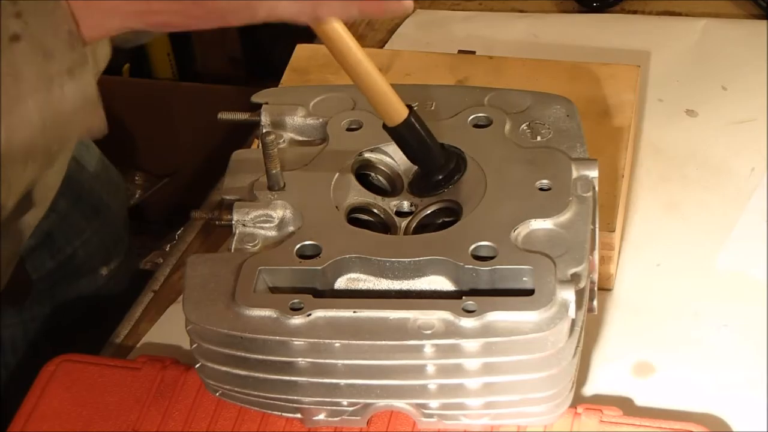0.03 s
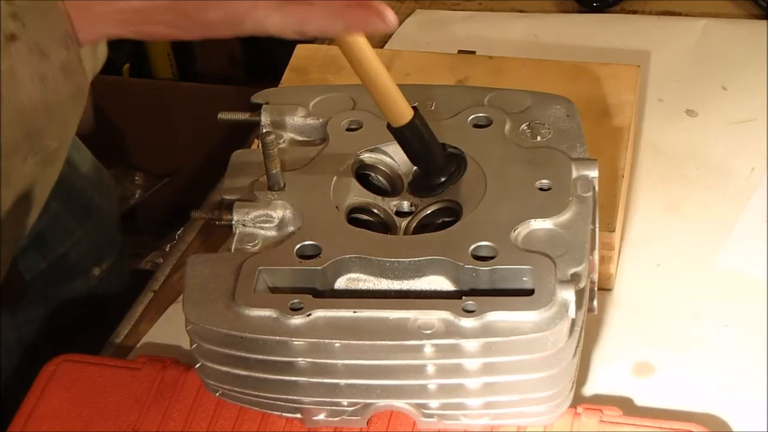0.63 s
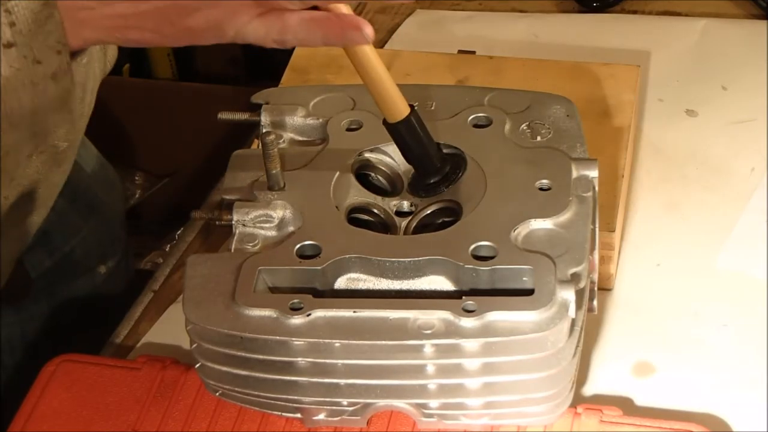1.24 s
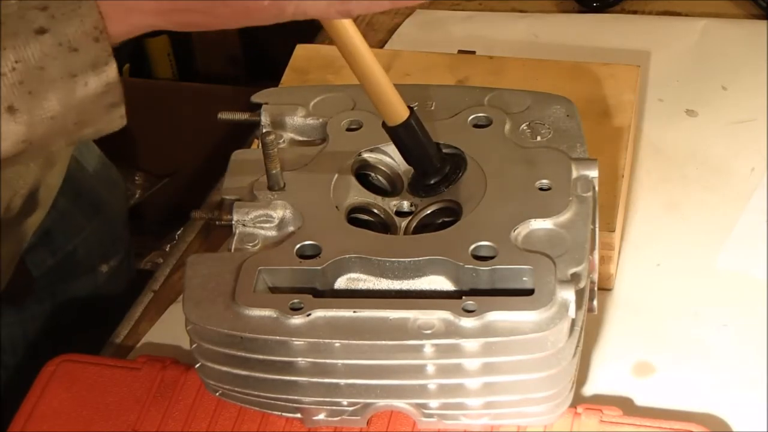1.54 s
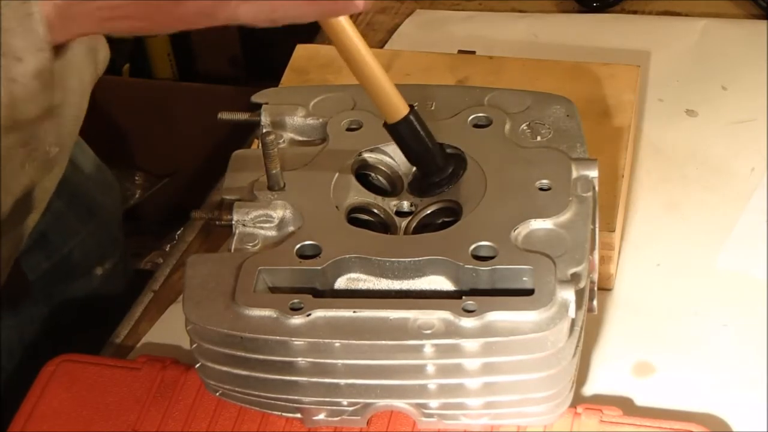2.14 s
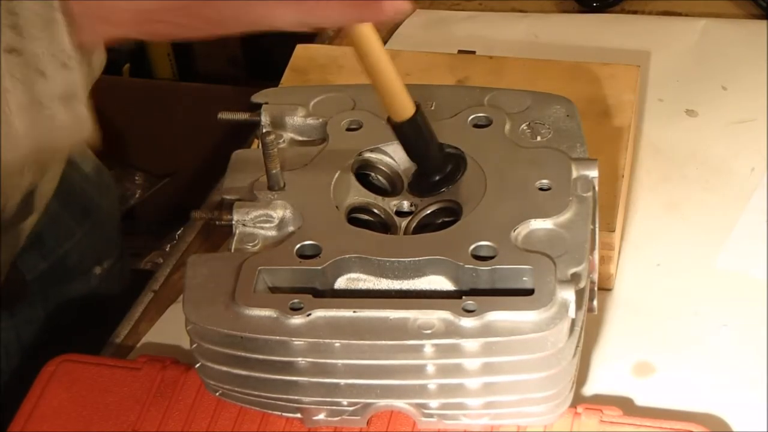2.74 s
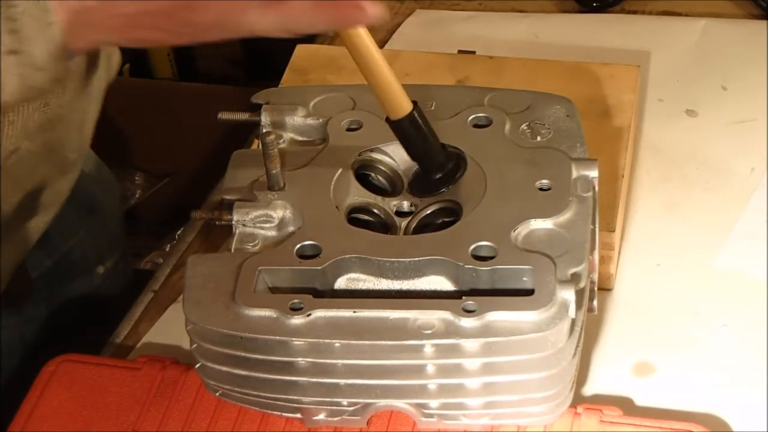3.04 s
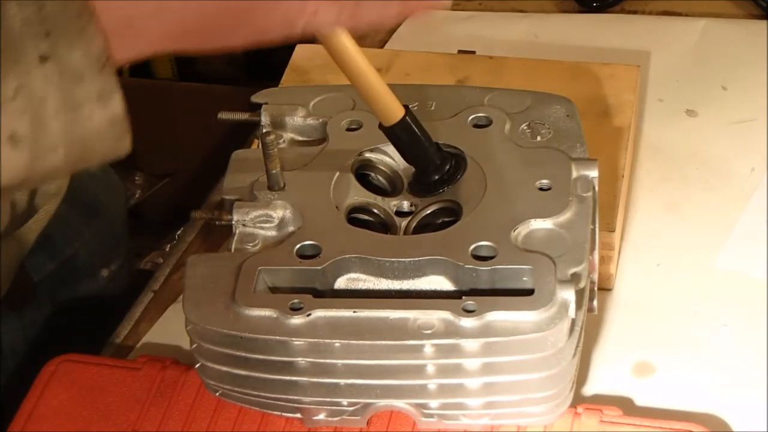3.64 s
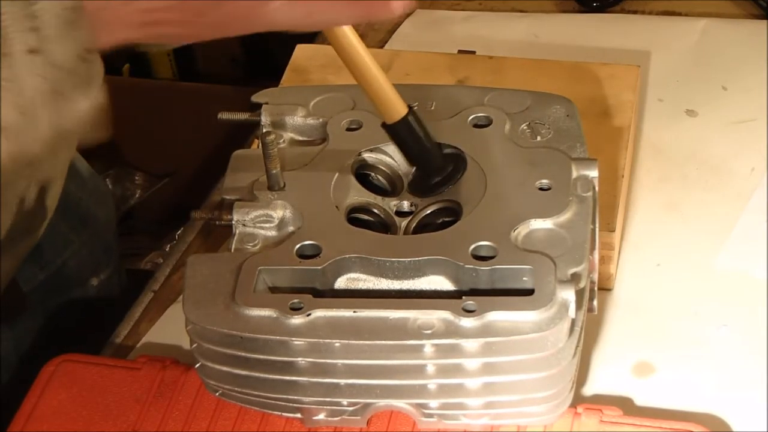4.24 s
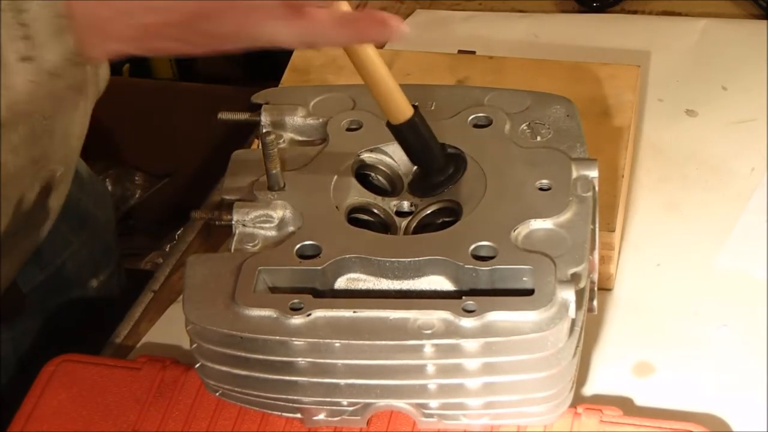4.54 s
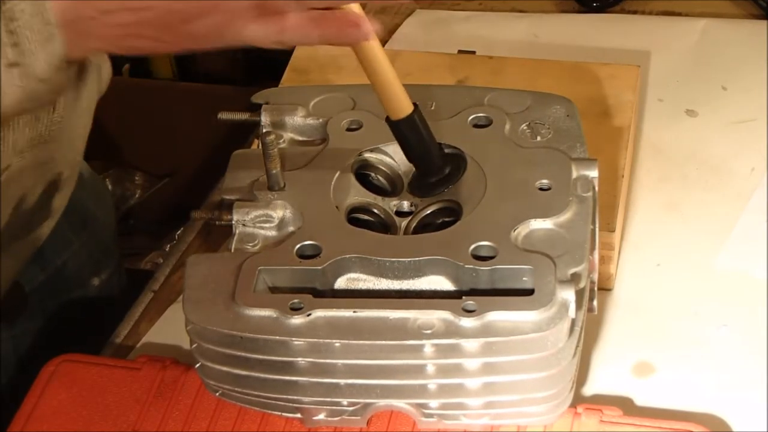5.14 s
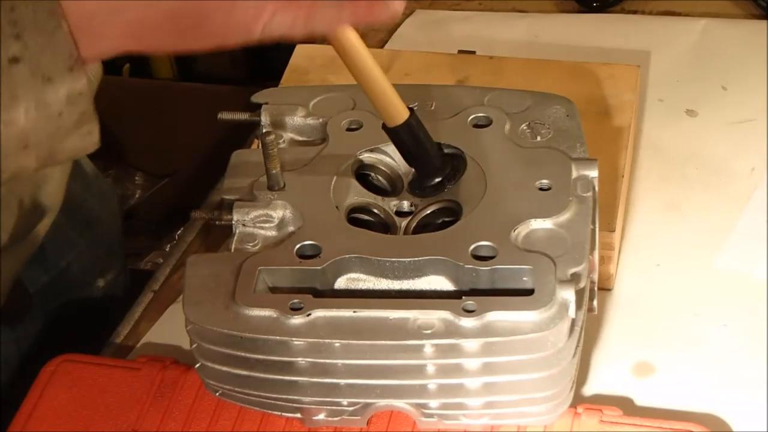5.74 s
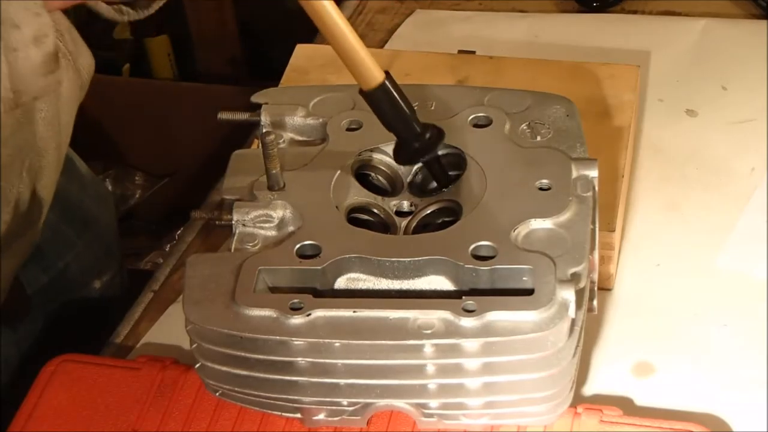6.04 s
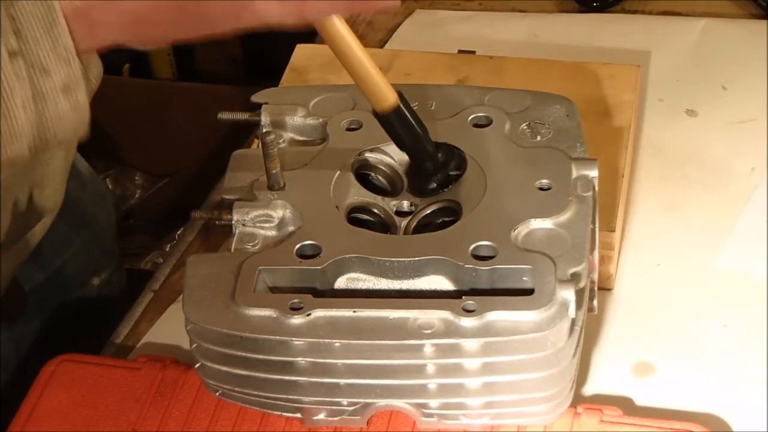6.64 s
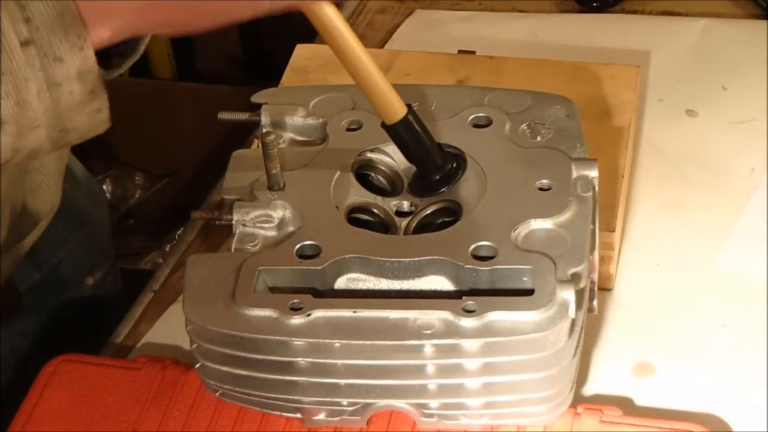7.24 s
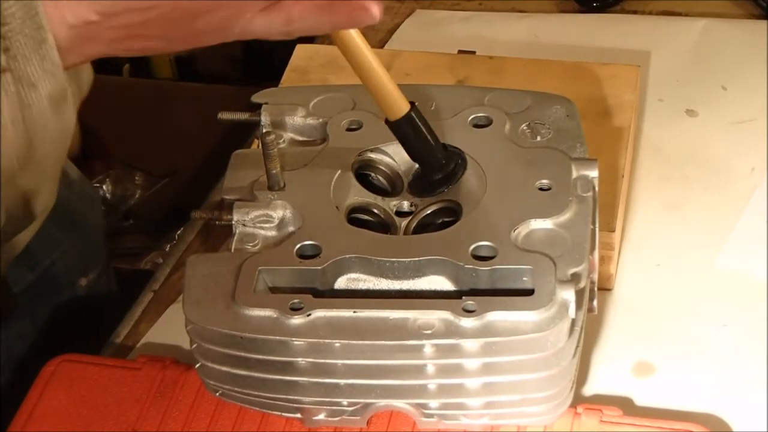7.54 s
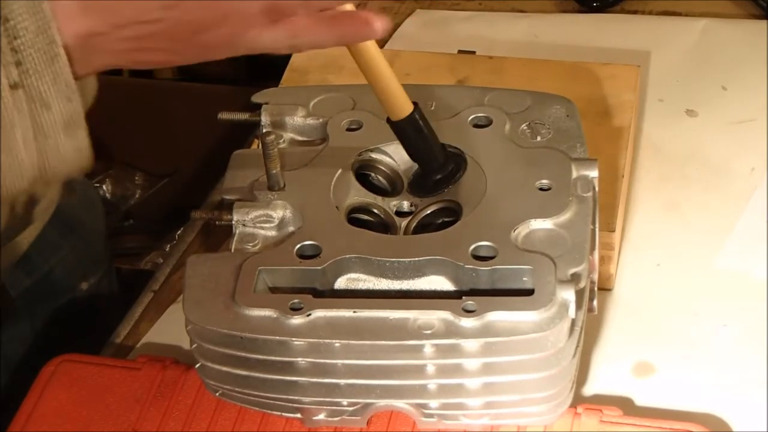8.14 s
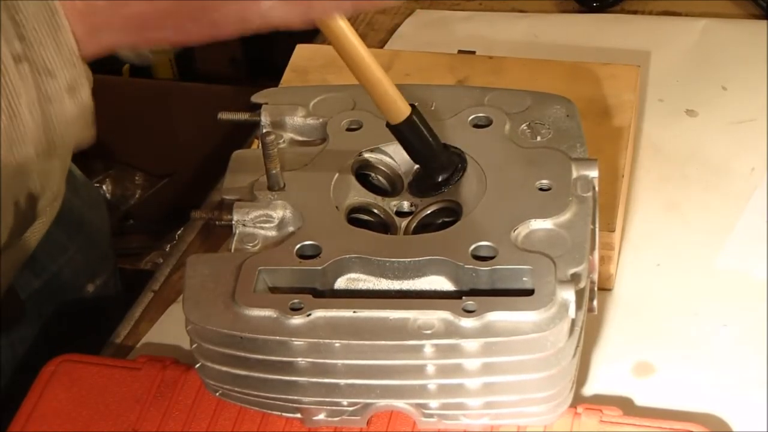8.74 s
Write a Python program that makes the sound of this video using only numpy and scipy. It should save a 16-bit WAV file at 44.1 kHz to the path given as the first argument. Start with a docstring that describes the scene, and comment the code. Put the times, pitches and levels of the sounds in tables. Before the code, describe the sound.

A valve is ground against its seat in an aluminium cylinder head, heard close up in a small workshop. The gritty rasping pulses at about ten strokes a second, each spell starting crunchy and wearing to a finer hiss that rings the metal. The first spell runs until 1.1 seconds. A light clink at 2 seconds starts the second, lasting to 3.4. After faint ticks, a ringing knock at 4.1 opens the third, which ends at 5.5. The stick's rubber suction cup snaps softly at 5.8. From 6.2 to 6.9 the valve is tapped on its seat about six times with sharp metallic clacks. Another knock at 7.2 leads into a last coarse spell, until 8.1. Two bright, ringing taps follow at 8.7 and 8.9. Soft bench thuds accompany the work, over a faint steady electrical hum.

```python
"""A small workshop, one microphone close to the bench, where a valve is lapped in an aluminium cylinder head.
A suction stick is rolled between the palms, and each half turn drags abrasive paste over the seat:
fresh grit crunches, then wears to a fine hiss that rings the casting. Between passes the valve is
lifted and tapped back on its seat. The rubber cup ticks, the bench thuds, and the room hums behind."""
import sys
import numpy as np
from scipy import signal
from scipy.fft import rfft, irfft
from scipy.io import wavfile
from scipy.ndimage import uniform_filter1d

SR = 44100
rng = np.random.default_rng(int(sys.argv[2]) if len(sys.argv) > 2 else 0)


def waveform_to_disk(signal):
    """Save audio, clipped to [-1, 1], as 16-bit WAV at the path in sys.argv[1]."""
    frames = np.transpose(np.atleast_2d(signal))
    scaled = np.clip(frames, -1, 1) * 32767
    samples = np.round(scaled).astype(np.int16)
    wavfile.write(sys.argv[1], SR, samples)


N = 391608
TIME = np.arange(N) / SR
RING_TIME = TIME[:SR // 2]
HALF_TURN_S = 0.104


def lapping(registers, lead_s=0.0097, grip=3.3, turn_db=-16, port_db=-13, port_share=0.62):
    """Close up, the valve speeds up and stops once a stroke; the grit it crushes excites the head."""
    start, length, accent = strokes().T
    start = start - lead_s
    stroke = np.maximum(np.searchsorted(start, TIME, side="right") - 1, 0)
    phase = np.clip((TIME - start[stroke]) / length[stroke], 0, 1)
    # the palms push early in some strokes and late in others
    skew = np.exp(0.27 * rng.standard_normal(len(start)))
    speed = np.sin(np.pi * phase ** skew[stroke]) ** 2
    friction = (np.tanh(grip * speed) + undb(turn_db)) * (phase < 1)
    # uneven paste makes the valve catch and slip
    catch = friction * undb(0.39 * wander(70))
    # coarse grains bite as soon as the valve turns and thin out along the stroke
    bite = np.tanh(7 * speed) * undb(-5 * phase)
    coarse = grit(per_second=800, spread_db=3.0) * bite * undb(2.0 * wander(150))
    fine = grit(per_second=4000, spread_db=3.0) * catch
    pressure_db, fresh_db = paste()
    stroke_db = accent + 0.5 * rng.standard_normal(len(start))
    force = undb(pressure_db + stroke_db[stroke])
    crunch = coarse * undb(-47 + fresh_db)
    # only big, fresh grains jolt the valve enough to sound the port
    hollow = crunch * undb(port_db + port_share * fresh_db)
    rasp = fine * undb(-38 + 0.31 * fresh_db)
    hiss = fine * undb(-41.5 + 0.32 * fresh_db)
    drives = hollow, crunch, rasp, hiss
    return sum(convolve(force * drive, register) for drive, register in zip(drives, registers))


def grit(per_second, spread_db):
    """Grains crack at random moments, a few much larger than the rest."""
    cracks = rng.random(N) < per_second / SR
    size = undb(spread_db * np.minimum(rng.exponential(size=N), 4))
    return unit(cracks * size * rng.choice([-1, 1], N))


# spells of rolling the stick; a very short one just turns the valve to a new place:
# start t/s, end t/s, mid-spell lag/s, hand pressure/dB, easing off/(dB/s), fresh grit/dB, crush time/s
SPELLS = [(-0.075, 1.135, 0.0033, 0.74, 2.5, 17, 0.61), (1.531, 1.628, 0, -23.5, 6, 10, 0.24),
          (2.007, 3.393, 0.018, 1.24, 5, 4.5, 0.2), (3.648, 3.76, 0, -20.5, 4, 12.5, 0.3),
          (4.142, 5.516, 0.004, -3.5, 1.4, 18, 0.11), (7.209, 8.141, 0.015, 0.23, 5.5, 17, 0.41)]

def strokes(push_db=0.45):
    """Half turns, slow then quicker, the push stronger than the return: start t/s, length/s, accent/dB."""
    rows = []
    for start, end, lag, *_ in SPELLS:
        count = max(round((end - start) / HALF_TURN_S), 1)
        progress = np.arange(count + 1) / count
        turns = start + (end - start) * progress + lag * np.sin(np.pi * progress)
        rows += zip(turns[:-1], np.diff(turns), push_db * (-1) ** np.arange(count))
    return np.array(rows)


def paste():
    """Hand pressure and the extra level of uncrushed grit, in dB: each spell starts fresh and wears down."""
    start, _, _, pressure, easing, fresh, crush_s = np.transpose(SPELLS)
    spell = np.maximum(np.searchsorted(start - HALF_TURN_S, TIME) - 1, 0)
    age = TIME - start[spell]
    uncrushed = np.exp(-(age / crush_s[spell]) ** 2)
    return pressure[spell] - easing[spell] * age, fresh[spell] * uncrushed


# modes of the air in the port and chamber: f/Hz, width/Hz before width_scale, relative level/dB
PORT_MODES = [(1008, 38, -13.5), (1049, 33, -12), (1069, 25, -2), (1099, 32, -10), (1194, 128, -17),
              (1301, 30, -16), (1648, 58, -20), (1810, 72, -14), (1972, 41, -7), (2051, 39, -12),
              (2314, 117, -16), (2520, 151, -14), (2925, 80, -13)]
# modes of the valve and casting, same columns
METAL_MODES = [(3612.0, 37.0, -16.8), (4196.0, 19.0, -7.1), (4769.0, 24.0, -11.3), (4859.0, 22.0, -11.4),
               (5349.0, 34.0, -8.9), (5549.0, 17.0, -6.2), (5780.0, 24.0, 2.0), (6215.0, 20.0, -5.8),
               (6451.0, 35.0, -8.2), (7199.0, 30.0, -19.9), (7465.0, 29.0, -13.5), (7611.0, 17.0, -11.9),
               (7905.0, 17.0, -8.4), (8024.0, 20.0, -16.1), (8197.0, 22.0, -13.5), (8662.0, 34.0, -10.5),
               (8822.0, 32.0, -11.4), (8937.0, 24.0, -14.7), (9257.0, 19.0, -13.5), (9410.0, 22.0, -5.0),
               (9634.0, 22.0, -13.3), (9713.0, 18.0, -9.3), (9955.0, 31.0, -9.1), (10269.0, 21.0, -14.7),
               (10349.0, 23.0, -9.5), (10585.0, 27.0, -14.4), (10861.0, 29.0, -9.8), (11141.0, 20.0, -13.8),
               (13928.0, 22.0, -18.8), (14870.0, 23.0, -16.7), (15563.0, 22.0, -18.5)]
# dense weak modes of the cooling fins: f/Hz, relative level/dB
FIN_SPECTRUM = [(500, -25), (780, -37), (1150, -9), (1500, -37), (1800, -20.5), (2500, -25.5), (3200, -26),
                (3900, -23), (4600, -25.5), (5700, -19.5), (6400, -31), (7200, -36), (10000, -16.5),
                (11800, -31), (13000, -25.5), (15300, -24.5)]
# borders of the port note, clack, ring and ping registers: f/Hz
REGISTER_EDGES = [660, 1500, 3300, 7000, 18000]

def cylinder_head(drive_spectrum=((1000, 0),), fins_db=0, width_scale=0.68):
    """The head's response at the seat, split into four registers of unit energy each."""
    drive_hz, drive_db = np.transpose(drive_spectrum)
    modes = list(PORT_MODES) + list(METAL_MODES)
    # neighbouring modes swing in opposite directions, except the close trio of the port note
    signs = -(-1) ** np.arange(len(modes))
    signs[1:4] = 1
    fins = [(hz, db + np.interp(hz, drive_hz, drive_db)) for hz, db in FIN_SPECTRUM]
    response = undb(fins_db) * tail(fins, t60=0.051)
    for sign, (hz, width, db) in zip(signs, modes):
        response += sign * ring([(hz, width_scale * width, db + np.interp(hz, drive_hz, drive_db))])
    parts = [band(response, lo, hi) for lo, hi in zip(REGISTER_EDGES, REGISTER_EDGES[1:])]
    return [part / np.sqrt(np.sum(part ** 2)) for part in parts]


# how the whole valve face drives the modes, against a single grain: f/Hz, level/dB
FACE_SPECTRUM = [(1000, 0.5), (2400, -4), (3000, -7), (3600, 6.5), (4200, 3.5), (5800, 2.5), (6300, -3),
                 (7500, -10), (10500, 4.5), (15000, -3.5)]
# the valve lands on its seat: t/s, level/dB, hardness/dB, extra metal ring/dB
LANDINGS = [(1.613, -41, -9, -2), (1.96, -28, 6, 6), (2.015, -19.5, 2, -4), (3.714, -34.5, 1, -2),
            (4.097, -19.5, 4, -4), (4.151, -10.5, -4.5, 10), (6.178, -8, -4.5, 2.5), (6.366, -8, 0.5, 0.5),
            (6.506, -8.5, 0, -7.5), (6.677, -8, -2.5, -2.5), (6.808, -8.5, 3, 1), (6.915, -16.5, -2.5, -1),
            (7.182, -20.5, 5, -17), (7.208, -11.5, -15, 7), (8.692, -7, 2, 12.5), (8.871, -6.5, 1, 7)]

def valve_knocks(registers, port_db=-10, clack_db=-20, ring_db=-28, ping_db=-30, ping_growth=1.6):
    """Each landing strikes the head; a harder one is brighter, and some leave the metal freer to ring."""
    out = np.zeros(N)
    attack = SR // 50
    voices = [register / np.sqrt(np.mean(register[:attack] ** 2)) for register in registers]
    for s, db, hard, free in LANDINGS:
        levels = [port_db, clack_db + hard, ring_db + hard + free, ping_db + ping_growth * hard]
        add(out, s, undb(db) * undb(levels) @ voices)
    return out


# the valve skips round its seat before it settles: t/s, length/s, level/dB
SKIPS = [(0.023, 0.08, -35), (2.017, 0.11, -36), (4.136, 0.05, -27.5), (7.215, 0.059, -21),
         (7.321, 0.028, -22.5)]

def valve_chatter(registers, per_second=170, clack_db=-13):
    """Quick, uneven little bounces keep the port note ringing."""
    port, clack = registers[:2]
    bounces = np.zeros(N)
    for s, length, db in SKIPS:
        count = int(length * per_second) + 1
        late, weak = rng.random((count, 2)).T
        times = s + (np.arange(count) + 0.696 * late) / per_second
        bounces[(times * SR).astype(int)] = undb(db - 6.2 * weak) * np.sqrt(SR / per_second)
    return convolve(bounces, port + undb(clack_db) * clack)


# the cup slips on the valve face: t/s, level/dB
CUP_SLIPS = [(3.551, -30), (3.8921, -34.5), (3.946, -28.5), (4.0662, -24.5), (5.807, -26), (5.816, -16.5),
             (5.8377, -13.5), (6.567, -29.5), (6.7147, -29), (7.7374, -26), (8.145, -28), (8.426, -37),
             (8.5085, -26.5)]
# short resonances of the cup: f/Hz, width/Hz, relative level/dB
CUP_MODES = [(2520, 480, 5.5), (5650, 700, -1), (7100, 1000, -5), (14500, 2500, -15)]

def rubber_cup(gain_db=-0.5, peel_db=-23, peel_s=0.012, click_db=-21, creak_delay_s=0.022):
    """Rubber lets go of oily steel: a snap and a brief peeling crackle ring the cup."""
    out = np.zeros(N)
    t = RING_TIME[:SR // 10]
    body = band(ring(CUP_MODES)[:len(t)], 1800, 17000, order=3)
    # the cup also creaks each time the twist reverses, louder under more pressure
    reversals = strokes()[:, 0]
    pressure_db = np.interp(reversals, TIME, paste()[0])
    creak_db = -33.5 + pressure_db + 2.5 * rng.standard_normal(len(reversals))
    ticks = list(CUP_SLIPS) + list(zip(reversals + creak_delay_s, creak_db))
    releases = undb(peel_db) * rng.standard_normal((len(ticks), len(t))) * np.exp(-t / peel_s)
    releases[:, 0] = 1  # the snap ahead of the crackle
    clicks = undb(click_db) * band(releases, 800, 14000, order=2)
    for (s, db), release, click in zip(ticks, releases, clicks):
        snap = convolve(release, body) + click
        add(out, s, undb(db + gain_db) * snap / np.abs(snap).max())
    return out


# modes of the bench top: f/Hz, width/Hz, relative level/dB
BENCH_MODES = [(58, 7.9, 8.5), (67.2, 5.6, -1)]
# the hands lean on the bench: t/s, peak level/dB
HAND_BUMPS = [(1.609, -44), (1.971, -32.5), (2.73, -37.5), (3.73, -40), (4.631, -33), (5.742, -39),
              (5.852, -36), (8.43, -39), (8.531, -35.5)]

def bench(stroke_db=-43, scatter_db=3, knock_db=-20, rumble_db=-59):
    """Under the head, the bench thuds at every stroke, landing and shift of the hands, over a low rumble."""
    boards = tail([(90, -56), (150, -26.5), (300, -21.0), (500, -26), (900, -70)], t60=0.21)
    thud = band(ring(BENCH_MODES) + boards, 41.5, 416, order=3)
    thud = thud / np.abs(thud).max()
    out = unit(band(rng.standard_normal(N), 37, 80, order=3)) * undb(rumble_db)
    for s, *_ in strokes():
        add(out, s + 0.032, undb(stroke_db + scatter_db * rng.standard_normal()) * thud)
    for s, db, *_ in LANDINGS:
        add(out, s, undb(db + knock_db) * thud)
    for s, db in HAND_BUMPS:
        add(out, s, undb(db) * thud)
    return out


# reflections off nearby surfaces: delay t/s, level/dB
REFLECTIONS = [(0.022, -24.5), (0.0447, -22.5)]

def room(direct):
    """The direct sound reaches the microphone first, then two dull echoes and a short diffuse tail."""
    echoes = np.zeros(len(RING_TIME))
    for s, db in REFLECTIONS:
        add(echoes, s, undb([db]))
    response = band(echoes, 200, 5200, order=1)
    add(response, .008, tail([(200, 3), (1000, -8.5), (5000, -12.5), (15000, -9.5)], t60=0.18))
    return direct + convolve(direct, response)


# workshop air: f/Hz, relative level/dB
AIR_SPECTRUM = [(71, -43), (120, -4), (128, -10.5), (251, -8.5), (483, -14), (698, -8), (3050, -19.5),
                (4600, -23), (12000, -25.5), (16000, -29)]
# mains hum: f/Hz, rms level/dB
MAINS_HUM = [(100, -56), (300, -70)]

def room_tone(air_db=-53.5):
    """Steady air noise and mains hum, far in the background."""
    hum = sum(undb(db) * np.sqrt(2) * np.sin(2 * np.pi * hz * TIME) for hz, db in MAINS_HUM)
    return hum + unit(colour(rng.standard_normal(N), AIR_SPECTRUM)) * undb(air_db)


def ring(modes):
    """Impulse response of damped resonances: f/Hz, width/Hz, level/dB."""
    t = RING_TIME
    return sum(undb(db) * 2 * np.pi * width / SR * np.exp(-np.pi * width * t) * np.sin(2 * np.pi * hz * t)
               for hz, width, db in modes)


def tail(spectrum, t60):
    """Countless overlapping resonances: a coloured wash that falls 60 dB in t60 seconds."""
    fade = np.exp(-np.log(1000) * RING_TIME / t60)
    return colour(rng.standard_normal(len(fade)), spectrum) * fade / np.sqrt(np.sum(fade ** 2))


def wander(rate_hz):
    """Smooth random drift with spread near 1."""
    hold = max(int(SR / rate_hz), 1)
    steps = np.repeat(rng.standard_normal(N // hold + 1), hold)
    return np.sqrt(3 / 2) * uniform_filter1d(steps, hold)[:N]


def colour(x, spectrum):
    """Filter along a curve of points: f/Hz, level/dB."""
    hz, db = np.transpose(spectrum)
    f = np.maximum(np.fft.rfftfreq(len(x), 1 / SR), 1)
    return irfft(rfft(x) * undb(np.interp(np.log(f), np.log(hz), db)), len(x))


def band(x, lo_hz, hi_hz, order=4):
    """Causal band-pass."""
    sos = signal.butter(order, [lo_hz, min(hi_hz, .48 * SR)], "bandpass", fs=SR, output="sos")
    return signal.sosfilt(sos, x)


def convolve(x, response):
    """Play x through an impulse response."""
    return signal.fftconvolve(x, response)[:len(x)]


def add(out, s, sound):
    """Mix a sound in at time s."""
    i = max(int(s * SR), 0)
    out[i:i + len(sound)] += sound[:max(len(out) - i, 0)]


def undb(db):
    """Decibels to gain."""
    return 10 ** (np.asarray(db) / 20)


def unit(x):
    """Scale to rms 1."""
    return x / np.sqrt(np.mean(x ** 2))


def scene():
    """From beside the bench, in mono: scrapes, knocks and ticks in the room, over thuds and room tone."""
    scraped = cylinder_head(fins_db=1.5)
    struck = cylinder_head(FACE_SPECTRUM, fins_db=-3.0)
    work = lapping(scraped) + valve_chatter(struck) + valve_knocks(struck) + rubber_cup()
    return (room(work) + bench() + room_tone())[None]


def record(dry):
    """The camera's microphone channel cuts off steeply above 15.9 kHz."""
    return signal.sosfilt(signal.ellip(10, .2, 80, 15900, fs=SR, output="sos"), dry)


dry = scene()
out = record(dry)
waveform_to_disk(out)
```